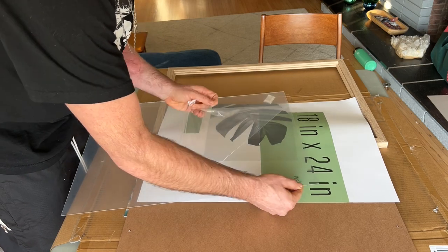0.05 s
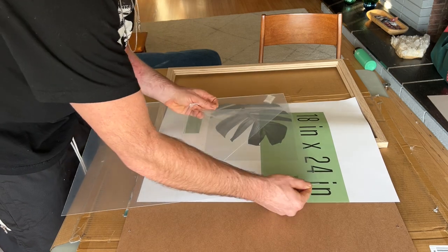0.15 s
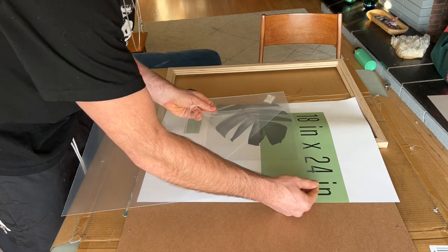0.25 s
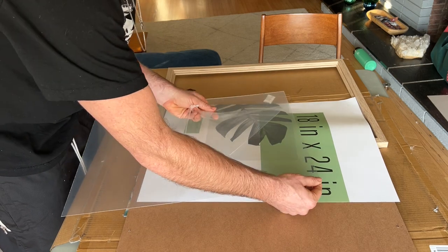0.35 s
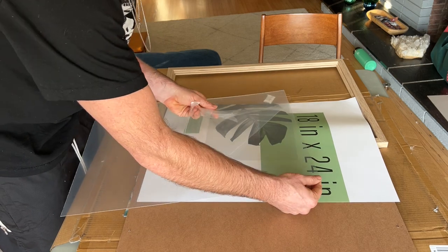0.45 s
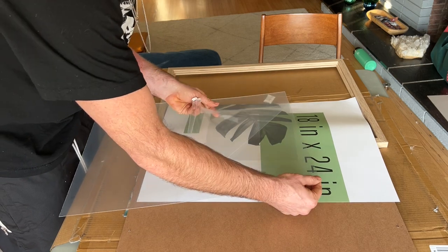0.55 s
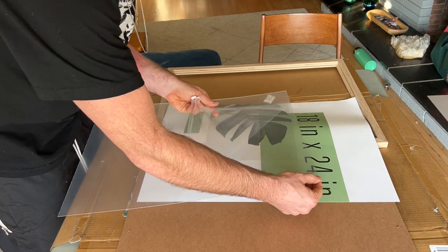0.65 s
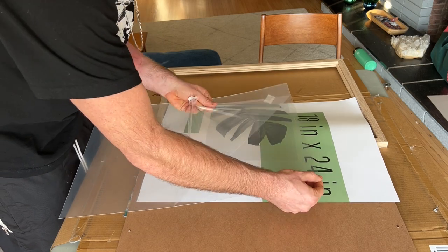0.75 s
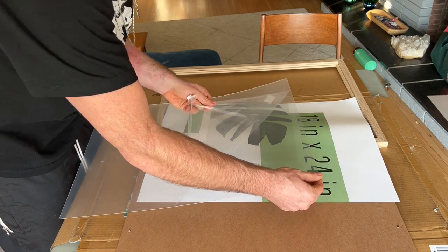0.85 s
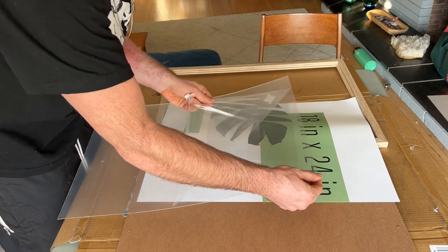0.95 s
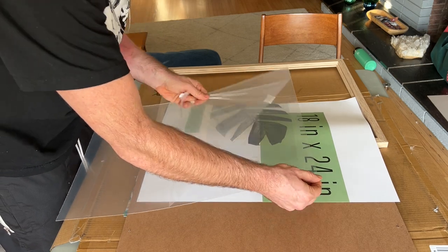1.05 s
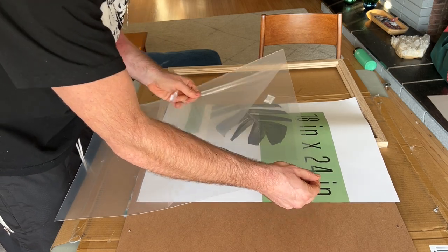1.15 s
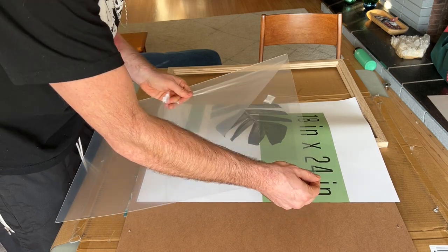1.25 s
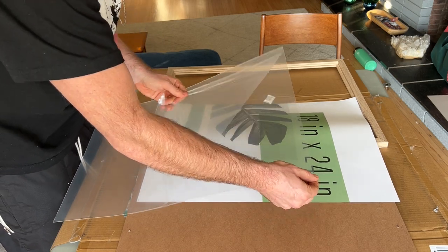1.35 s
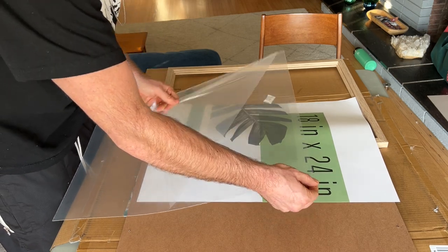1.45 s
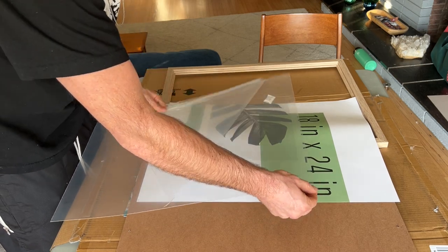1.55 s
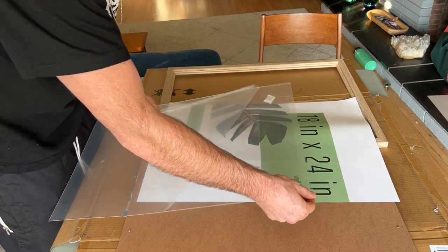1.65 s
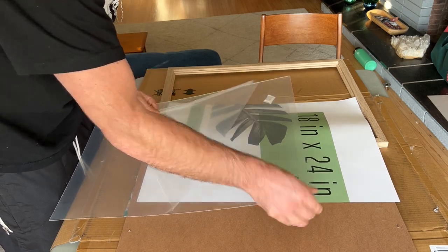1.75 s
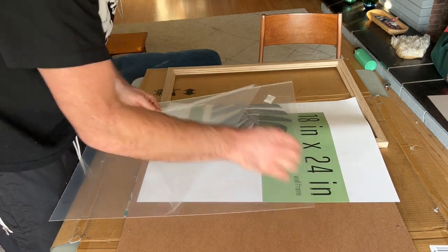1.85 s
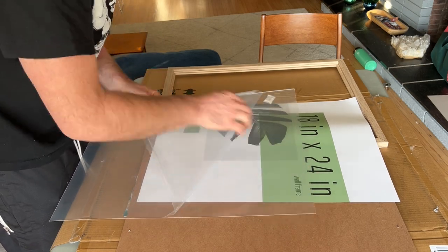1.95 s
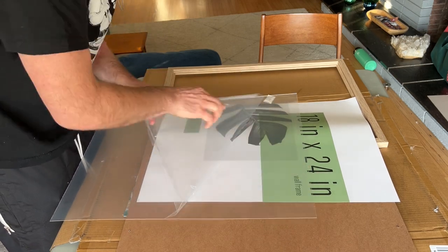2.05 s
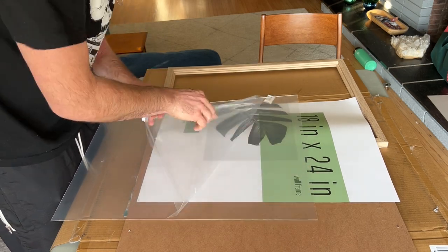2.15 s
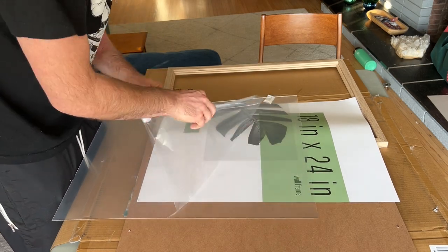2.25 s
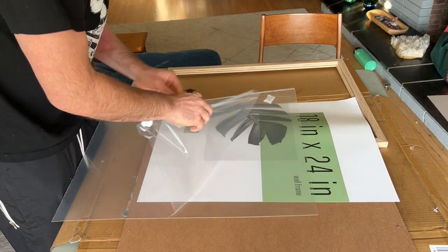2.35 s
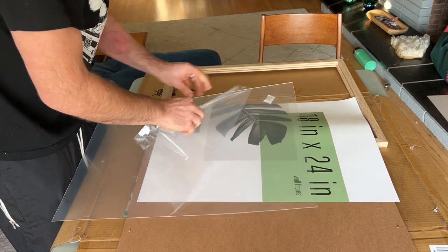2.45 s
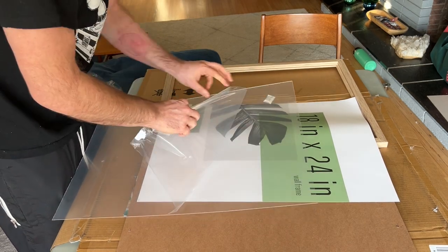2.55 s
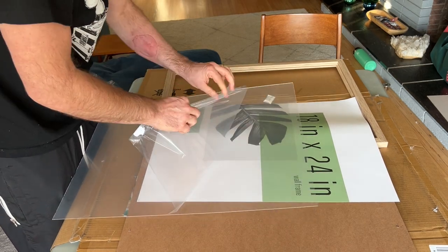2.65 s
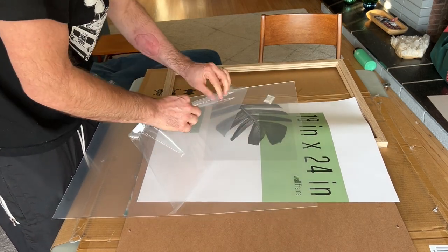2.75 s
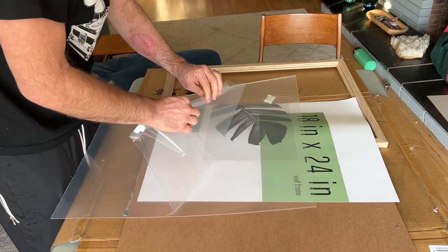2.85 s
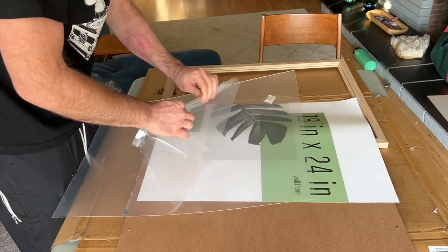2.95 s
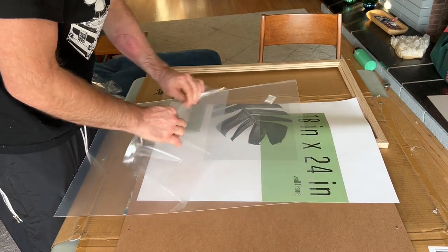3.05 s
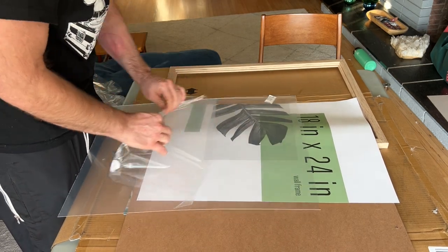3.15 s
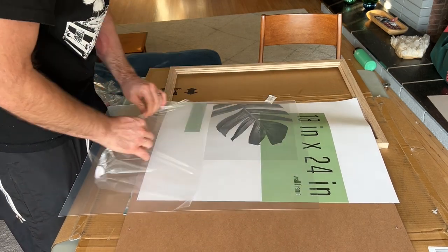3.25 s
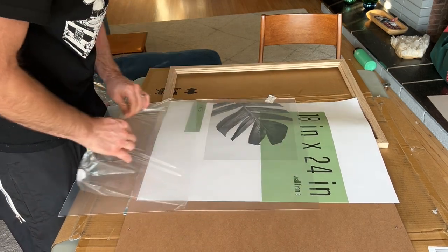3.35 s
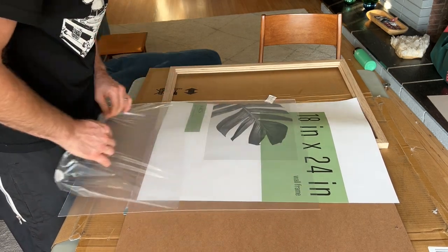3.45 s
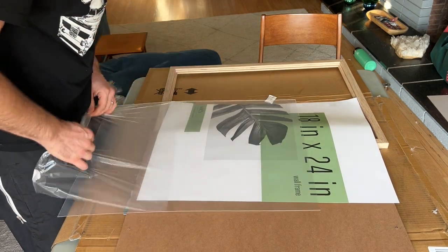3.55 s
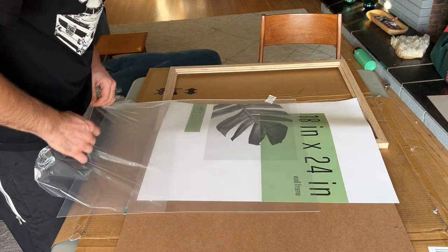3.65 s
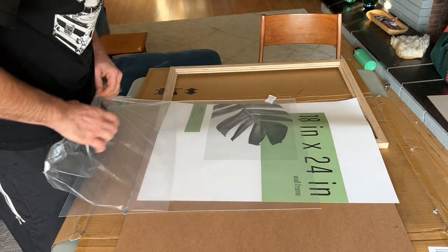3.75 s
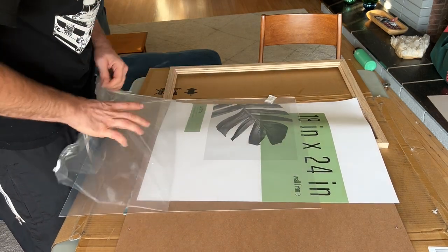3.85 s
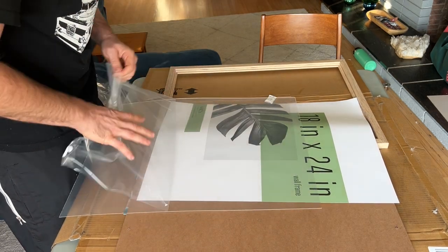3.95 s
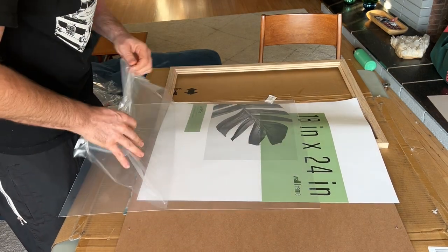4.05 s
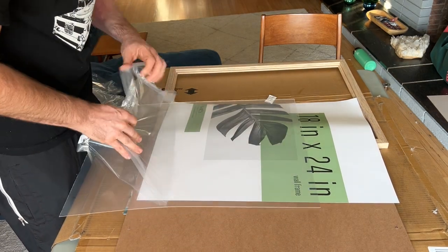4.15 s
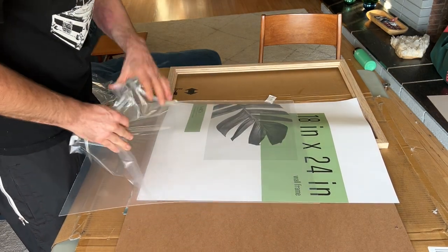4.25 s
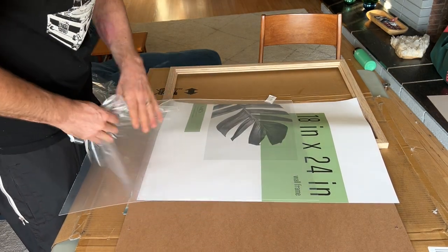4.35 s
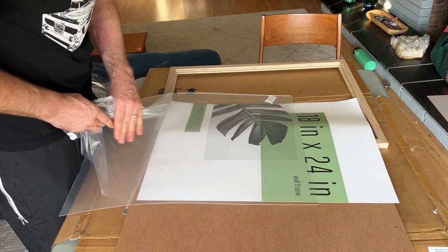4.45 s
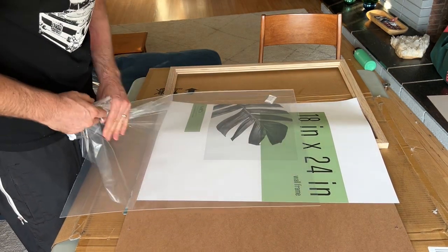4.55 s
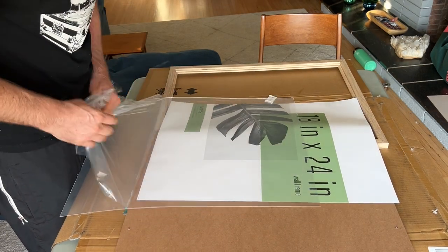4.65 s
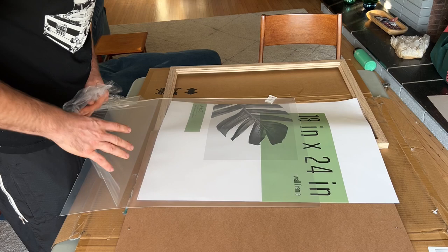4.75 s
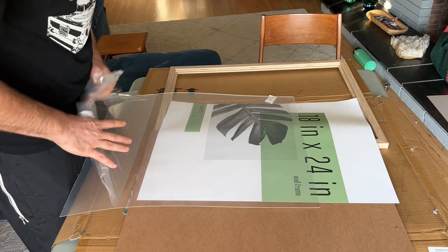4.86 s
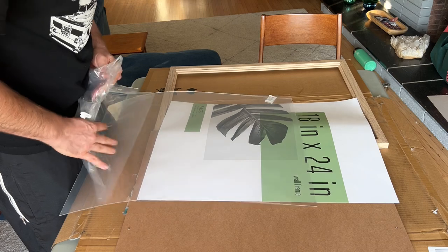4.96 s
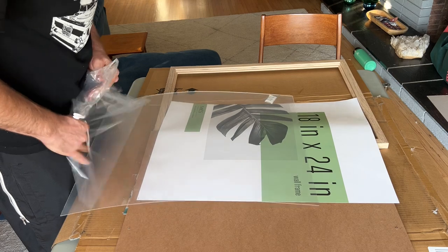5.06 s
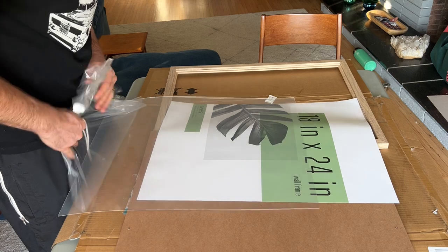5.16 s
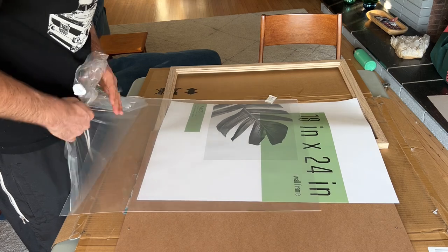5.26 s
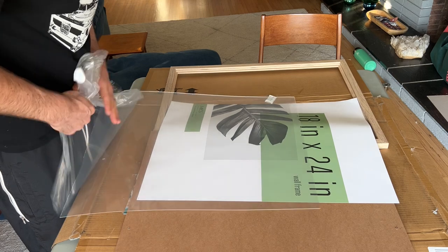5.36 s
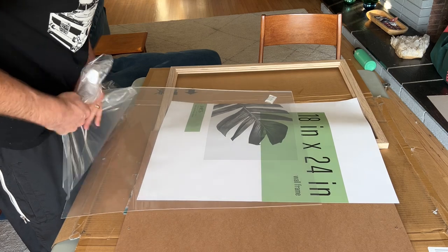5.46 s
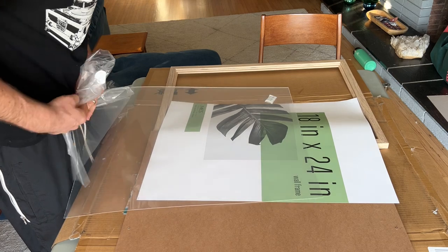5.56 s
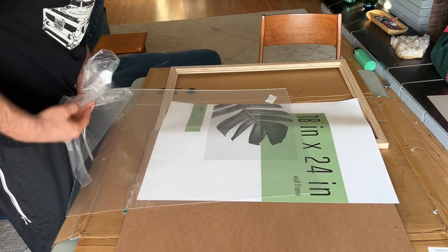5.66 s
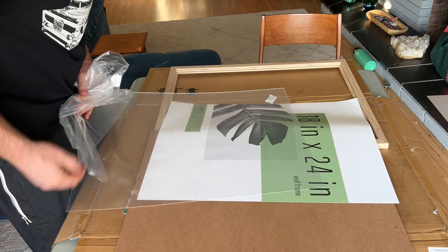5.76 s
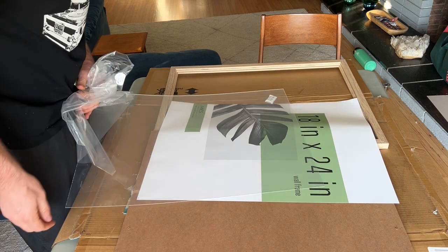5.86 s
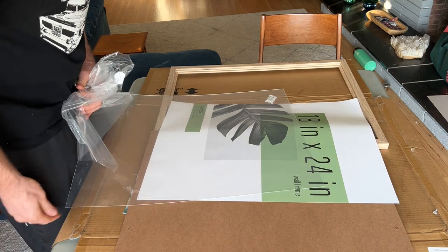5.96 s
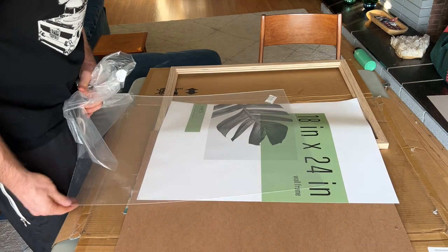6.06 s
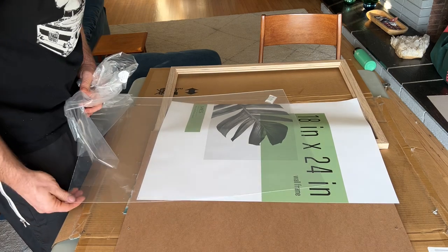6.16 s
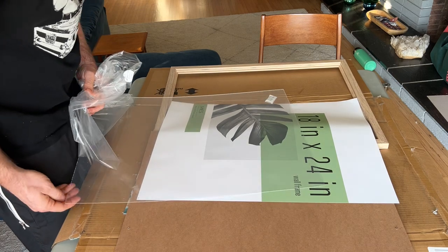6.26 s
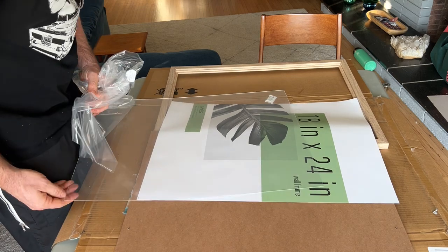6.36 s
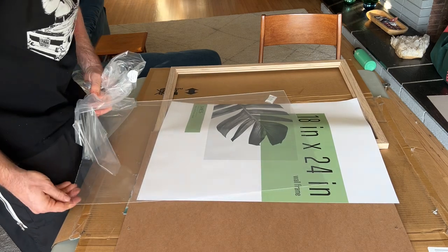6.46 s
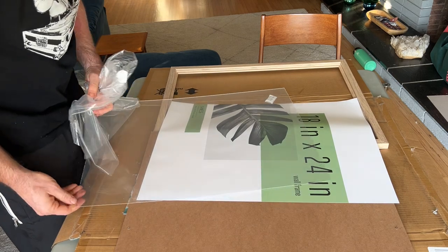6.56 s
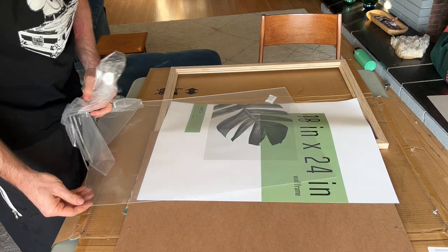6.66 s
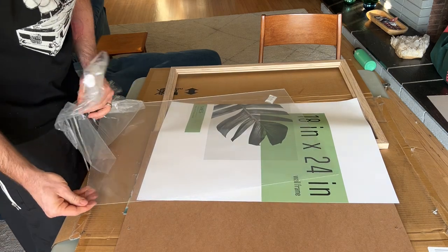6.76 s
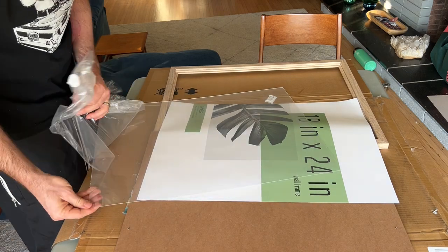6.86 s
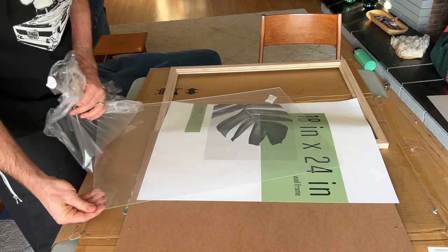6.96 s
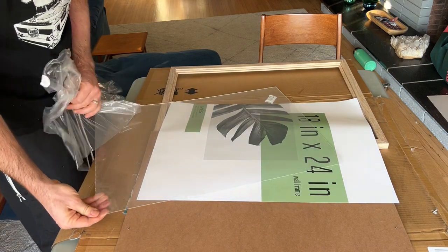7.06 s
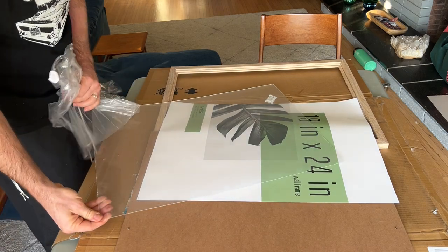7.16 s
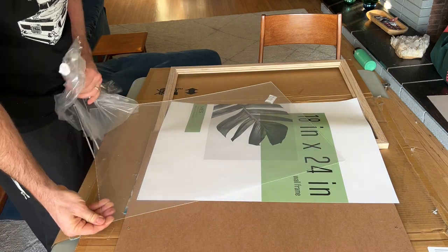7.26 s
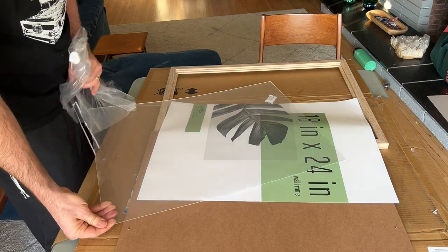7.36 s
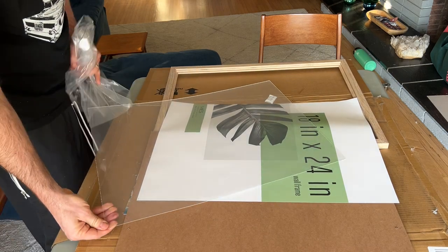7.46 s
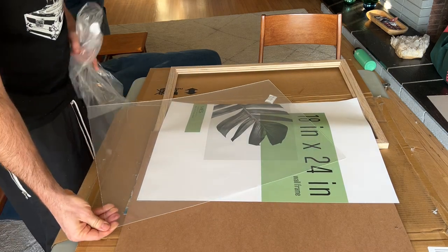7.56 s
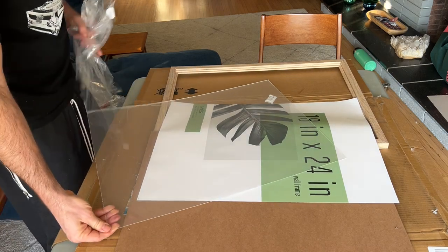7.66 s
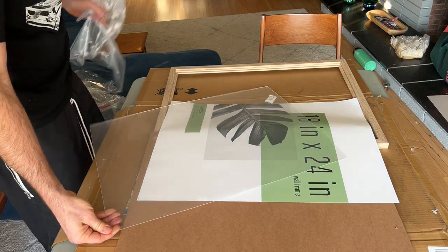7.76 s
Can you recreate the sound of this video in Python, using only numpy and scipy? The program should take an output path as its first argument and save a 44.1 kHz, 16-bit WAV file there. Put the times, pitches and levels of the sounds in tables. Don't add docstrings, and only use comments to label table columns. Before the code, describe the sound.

Thin plastic film is peeled off a stiff sheet in crackling pulls and short zipping slips, then crumpled and rustled by hand in a furnished room.

```python
import sys
import numpy as np
from scipy import signal
from scipy.fft import rfft, irfft, next_fast_len
from scipy.io import wavfile
from scipy.ndimage import uniform_filter1d

SR = 44100
rng = np.random.default_rng(int(sys.argv[2]) if len(sys.argv) > 2 else 0)


def makeup_ratio(level_db):
    decades = np.asarray(level_db, float) / 20
    return 10 ** decades


def generate_wav(signal):
    frames = np.transpose(np.atleast_2d(signal))
    scaled = np.clip(frames, -1, 1) * 32767
    pcm = np.round(scaled).astype(np.int16)
    wavfile.write(sys.argv[1], SR, pcm)


N = 343627


def evened(x):
    return x / np.sqrt(np.mean(x ** 2) + 1e-20)


def smooth_patches(noise, bands, frames):
    return evened(uniform_filter1d(uniform_filter1d(noise, size=bands, axis=0), size=frames, axis=1))


def read(points, hz):
    f, value = np.transpose(points)
    return np.interp(np.log(hz + 1), np.log(f + 1), value)


def add(mix, s, sound):
    part = mix[round(s * SR):][:len(sound)]
    part += sound[:len(part)]


def resonate(x, hz, width):
    turn = np.exp(2j * np.pi * np.cumsum(hz * np.ones(len(x))) / SR)
    r = np.exp(-np.pi * width / SR)
    return 2 * (turn * signal.lfilter([1 - r], [1, -r], x / turn)).real


def band(x, lo_hz, hi_hz, order=2):
    return signal.sosfilt(signal.butter(order, [lo_hz, hi_hz], "band", fs=SR, output="sos"), x)


def snaps(per_s, spread_db, clump_db):
    size = makeup_ratio(spread_db * np.minimum(rng.exponential(1, N), 4)) * rng.choice([-1., 1.], N)
    clumps = evened(uniform_filter1d(uniform_filter1d(rng.standard_normal(N), size=200), size=200))
    happens = rng.random(N) < per_s / SR
    return evened(size * happens * makeup_ratio(clump_db * clumps))


def sheet(x):
    # pitch in Hz, width in Hz, level in dB.
    bending_modes = [(165.5, 34, -1.5), (212.5, 27, -9), (404, 143, 4.5), (467.5, 17, -3), (753, 160, -4.5),
                     (1000, 280, -7)]
    total = np.zeros(len(x))
    for hz, width, db in bending_modes:
        total += makeup_ratio(db) * evened(signal.lfilter(*signal.iirpeak(hz, hz / width, SR), x))
    return evened(band(total, 86, 1800))


def rumble():
    # pitch in Hz, level in dB per Hz.
    house_noise = [(15, -18), (30, -18), (52, -2), (80, 3.5), (115, -14), (158, -11), (250, -22.5),
                   (390, -23.5), (500, -18), (600, -24), (750, -30), (1000, -32), (1600, -29.5),
                   (3500, -36), (6400, -32), (10000, -34.5), (16000, -36)]
    rumble_db, patchy_db = -45.5, 0.37
    frames, hz = N // 512 + 5, np.fft.rfftfreq(2048, 1 / SR)
    a, b, c, d, patches = rng.standard_normal((frames, 1025, 5)).T
    patches = smooth_patches(patches, 12, 8)
    z = np.array([a + 1j * b, c + 1j * d]) * makeup_ratio(read(house_noise, hz)[:, None] + patchy_db * patches)
    return makeup_ratio(rumble_db) * evened(signal.istft(z, nperseg=2048, noverlap=1536)[1][:, :N])


def rustle():
    # peak time in seconds, peak level in dB, build-up in seconds, settling in seconds,
    # sheet wobble in dB. Build-up and settling are the times for a change of squeeze_db.
    handfuls = [(0.0, -37.5, .01, 0.24, 7), (.49, -34.5, .004, 0.2, -7.5), (.712, -49.5, 0.013, 0.076, 14),
                (1.12, -33.5, 0.12, .03, 1.5), (2.192, -36.5, 0.11, 0.32, -1), (2.59, -46, 0.56, 0.036, -2),
                (2.8, -44.5, 0.18, 0.04, -18), (3.84, -44, 0.6, 0.2, 2), (4.04, -26, 0.23, 0.17, -2.5),
                (4.569, -17, 0.23, 0.038, -1.5), (4.91, -23, 0.13, 0.045, -2), (5.56, -20.5, .04, 0.33, -3),
                (.46, -56, 0.038, 0.035, 5), (6.308, -48.5, 0.021, 0.98, 2), (6.64, -54, 0.055, 0.053, -25),
                (6.848, -45.5, 0.17, 0.022, -5), (7.68, -31.5, 0.013, 0.13, -15),
                (7.76, -42.5, 0.12, 0.18, 9), (.899, -44, .003, 0.078, 0), (2.29, -42, 0.083, 0.19, -25),
                (5.74, -50, 0.1, 0.12, 16.5), (5.985, -55, .012, 0.15, 20.5), (6.09, -57, 0.015, 0.1, 18.5)]
    squeeze_db = 20
    level, shake = np.zeros((2, N))
    for s, db, build, settle, wobble_db in handfuls:
        start = max(s - 2 * build, 0)
        t = np.arange(start, s + 2 * settle, 1 / SR) - s
        squeeze = makeup_ratio(db - squeeze_db * np.maximum(-t / build, t / settle))
        add(level, start, squeeze)
        add(shake, start, squeeze * makeup_ratio(wobble_db - 7.5))
    crinkle = evened(band(snaps(700, 1.9, 5.1), 3900, 22000, order=1))
    slide = evened(band(snaps(15000, 2.5, 3.), 920, 18400, order=1))
    wobble = sheet(snaps(1200, 1.5, 2.2))
    return level * (0.41 * crinkle + 0.61 * slide) + shake * wobble


def ticks():
    # start in seconds,
    # peak level in dB, ring pitch in Hz, bright click over the peak in dB.
    crease_flips = [(0.2063, -28.5, 3750, -11), (0.4885, -41, 6760, 16.5), (0.5591, -33, 7310, -2),
                    (0.5734, -26, 2630, -13), (0.6153, -19, 6240, 0), (0.6893, -24.5, 2660, -4),
                    (0.7295, -30, 7100, -4), (0.8988, -29, 2640, -2.5), (0.968, -24.5, 6000, -14),
                    (1.044, -21.5, 7400, -4), (1.054, -22, 7280, -18), (1.0863, -24, 4920, -11),
                    (1.97, -31, 2590, -11), (2.0617, -34, 3500, -21), (2.0885, -29.5, 6670, -24),
                    (2.2544, -32, 5220, -14), (2.3042, -24, 2800, -18), (2.342, -22, 2440, -30),
                    (2.365, -20, 3170, -17), (2.3796, -9, 6300, -26), (2.749, -32, 3960, -17),
                    (2.766, -29, 4090, -21),
                    (3.677, -16, 2450, -9), (3.779, -27, 7600, -2), (3.828, -27, 2150, -20),
               (3.8752, -35, 2340, -15.5), (3.9097, -22, 2400, -17), (3.994, -31, 5370, -27),
               (4.0324, -22, 2660, -2), (4.1186, -26, 2640, -8), (4.1673, -25, 5100, -15),
               (4.498, -28, 3240, -10.5), (5.714, -35, 6255, 11), (5.776, -35, 4300, 9),
               (5.9738, -29, 2482, -22), (5.9816, -25, 2330, -13), (6.0363, -30, 2660, -19),
               (6.228, -38, 2680, -5), (6.308, -32, 4350, -9), (6.36, -40, 3060, -6),
               (6.428, -23.5, 7030, -14), (6.4353, -27, 7800, -22), (6.4916, -34, 5100, -9),
               (6.627, -31, 4830, -16), (6.6367, -41, 4500, -7), (6.707, -33, 2670, -28),
               (6.7675, -34, 3930, -17), (6.825, -28, 3460, -14), (.2976, -37, 3390, -2),
               (.847, -49, 5090, -6), (2.136, -33, 6500, -2)]
    # start in seconds, peak level in dB,
    # ring pitch in Hz, bright click over the peak in dB, dying time in ms.
    tears = [(1.008, -34, 6000, -10, 1.5), (1.012, -33, 2750, -12, 4.5), (1.07, -25, 3000, -10, 1.2),
             (1.0745, -32, 4000, -12, 1.5), (1.0795, -27, 2300, -18, 1), (1.1027, -22, 2270, -10, 3.2),
             (1.1254, -11, 3480, -10, 2.7), (1.3715, -21, 2500, -14, 1.1), (1.377, -12, 4970, -9, 2),
             (1.388, -17, 4000, -12, 1.5), (1.3962, -14, 5000, -12, 1.5), (1.4017, -13, 5000, -12, 1.5),
             (1.93, -41, 5500, -21, 4), (2.2767, -34, 1900, -19, 4.1), (2.35, -32, 2410, -20, 1.2),
             (2.811, -27, 6000, -14, 1.2), (2.8568, -10, 3500, -12, 1), (.4708, -52, 7500, -4, 1.1),
             (.3162, -41, 4000, -12, 1), (0.3458, -41, 1760, -14, 1), (0.829, -50, 5250, -16, 1),
             (2.105, -46, 7500, 0, 1), (2.1435, -41, 2200, -16, 1.7), (3.747, -40, 2003, -16, 1.7),
             (3.815, -33, 2000, -18, 1.2), (5.91, -34, 1500, -16, 2), (6.14, -49, 4000, -20, 2),
             (6.182, -50, 4000, -20, 2)]
    flip_ms = .6
    rows = [(*row, flip_ms) for row in crease_flips] + tears
    out, t = np.zeros(N), np.arange(800) / SR
    for (s, db, hz, bright_db, ms), grit in zip(rows, rng.standard_normal((len(rows), 800))):
        ring = evened(resonate(grit, hz, 0.67 * hz))
        crack = band(grit, 940, 9300, order=1)
        click = makeup_ratio(bright_db + 16) * band(grit, 8200, 14000, order=1)
        dying = np.exp(-t * 1000 / max(ms, .2)) * np.minimum(t / 0.00026, 1)
        add(out, s, makeup_ratio(db - 0.3) * dying * (0.45 * ring + 0.85 * crack + click))
    return out


def bumps():
    # start in seconds, peak level in dB, first pitch in Hz, time to die by 60 dB in seconds.
    knocks = [(.705, -43, 600, .08), (2.18, -27.5, 426, 0.071), (4.718, -32, 76.5, 0.13),
              (5.198, -31, 87, 0.27), (5.31, -21, 490, 0.097), (5.801, -42, 85, .14),
              (5.978, -34, 1000, .08), (1.56, -29, 800, .1), (1.6, -27, 1700, .08), (2.858, -27, 420, .1),
              (2.9, -27, 400, .08), (6.077, -36, 1080, 0.15), (6.706, -41.5, 896, 0.33),
              (6.789, -44, 1710, 0.065), (7.72, -23, 1040, .07), (7.731, -31, 640, .06),
              (7.747, -28.5, 560, .07), (2.17, -34.5, 1910, 0.23), (3.75, -42, 605, .2),
              (6.035, -41, 2700, .06)]
    sag_octaves, sag_s = 1.1, .03
    puff_share, tone_hz = .6, 700
    out, t = np.zeros(N), np.arange(8000) / SR
    puffs = rng.standard_normal((len(knocks), 8000))
    for (s, db, first_hz, t60), puff in zip(knocks, puffs):
        hz = first_hz * 2 ** (-sag_octaves * (1 - np.exp(-t / sag_s)))
        wide = .7 * first_hz
        tone = np.sin(2 * np.pi * np.cumsum(hz) / SR) * tone_hz / (tone_hz + first_hz)
        knock = tone + puff_share * evened(resonate(resonate(puff, hz, wide), hz, wide))
        add(out, s, makeup_ratio(db - 60 * t / max(t60, .01)) * np.minimum(t / 0.0014, 1) * knock)
    return out


def taut(s):
    # time in seconds, ring of the taut film in Hz, slack in dB.
    film_states = [(1.2, 5900, 5.5), (1.39, 5530, 10), (1.45, 6060, 1.5), (1.6, 4750, 1), (2.93, 5500, -4),
                   (3.14, 5960, -1), (3.55, 5740, -1), (4.22, 4840, -0.5), (4.33, 6000, 0),
                   (4.6, 5330, -2.5), (4.95, 5330, 6.5), (5.04, 5900, 6.5), (5.3, 5960, 7.5),
                   (5.46, 4680, 11), (6.94, 4800, 1), (7.3, 4930, 0.5), (7.46, 6400, 0), (7.65, 7900, -5)]
    when, ring_hz, slack_db = np.transpose(film_states)
    return np.interp(s, when, ring_hz), np.interp(s, when, slack_db)


def film(ring_hz):
    dense = snaps(6000, 1.7, .6)
    body = resonate(resonate(dense, ring_hz, 3700), ring_hz, 3800)
    fine = band(snaps(9000, 2.6, .6), 8160, 14500)
    coarse = band(snaps(2500, 2.4, 0.64), 1425, 3890)
    return evened(band(body, 2950, 8640)), evened(fine), evened(coarse)


def pulls(body, fine, coarse):
    # start in seconds, hold in seconds, rise in seconds, first level in dB, last level in dB.
    steady_pulls = [(1.124, 0.11, 0.015, -25, -18.5), (1.376, 0.23, 0.04, -16, -15.5),
                    (2.92, 0.62, 0.021, -18, -14), (4.203, 0.071, 0.027, -18.5, -17),
                    (4.32, 0.069, 0.012, -18, -15), (4.554, 0.19, 0.042, -15.5, -14.5),
                    (4.93, 0.055, 0.017, -19, -16), (5.013, 0.067, .007, -14.5, -17.5),
                    (5.143, 0.074, 0.023, -23, -20), (5.3, 0.075, 0.0091, -23.5, -18.5),
                    (5.429, 0.12, 0.057, -16.5, -23.5), (6.916, 0.2, 0.024, -23.3, -25),
                    (7.119, 0.54, 0.047, -28, -23)]
    swell, let_go_db_per_s = 0.43, 413
    jolt_db, jolt_s = 7.5, 0.022
    pull, jolt = np.zeros((2, N))
    for s, hold, rise, first_db, last_db in steady_pulls:
        t = np.arange(0, hold + .12, 1 / SR)
        db = first_db + (last_db - first_db) * np.minimum(t / hold, 1) ** swell
        db = db - let_go_db_per_s * np.maximum(t - hold, 0)
        add(pull, s, np.minimum(t / max(rise, .001), 1) * makeup_ratio(db))
        add(jolt, s, makeup_ratio(jolt_db) * np.exp(-t / jolt_s))
    ring_hz, slack_db = taut(np.arange(N) / SR)
    bright = makeup_ratio(3 + 4.5 * np.log2(ring_hz / 5620) + 0.26 * slack_db) * (1 + 0.4 * jolt)
    creasing = pull ** 0.7 * makeup_ratio(-21.5 + slack_db)
    shake = pull ** 0.49 * makeup_ratio(-29 + 1.13 * slack_db) * (1 + jolt)
    wobble = uniform_filter1d(shake, size=1500, origin=400) * sheet(snaps(2500, 2.0, 2.0))
    return pull * (body + bright * fine) + creasing * coarse + wobble


def slips(body, fine, coarse):
    # start in seconds, peak level in dB, length in ms, fine snaps in dB, rise in ms.
    short_slips = [(2.381, -9, 21.6, -2.5, 4.6), (2.4155, -10.5, 18, -2, 1.5), (2.4465, -10.5, 27, -1.5, 3),
                   (2.4797, -9, 24, -7, 3.8), (2.527, -8.5, 14.5, -6, 5), (2.8153, -9.5, 32, -7.5, 0.56),
                   (2.8598, -7, 11, -7.5, 1.2), (2.897, -11.5, 31, -13, 2), (4.878, -32, 23, 10.5, 2),
                   (5.128, -12.5, 13, 2, 1), (5.262, -14.5, 19, -4, 2.5), (5.441, -19.5, 24, -4, 5.4),
                   (4.93, -16, 11, -6, 2), (4.319, -15, 13, 3, 2), (6.854, -25.5, 33, -6, 2.7),
                   (6.8847, -19, 20, -7, 3.4), (6.903, -22, 8.9, -4, 1.2), (4.205, -17, 14, -3, 2)]
    coarse_db, wobble_db = -6, -12
    wobble = sheet(snaps(1300, 5.3, 3.1))
    out = np.zeros(N)
    for s, db, ms, fine_db, rise_ms in short_slips:
        at = np.arange(round(s * SR), round((s + .06) * SR))
        u = (at / SR - s) * 1000 / max(ms, 1)
        hold = (1 - np.exp(-u * ms / max(rise_ms, .2))) * np.exp(-u ** 3)
        loose = makeup_ratio(taut(s)[1]) * (makeup_ratio(coarse_db) * coarse[at] + makeup_ratio(wobble_db) * wobble[at])
        add(out, s, makeup_ratio(db - 7.5) * hold * (body[at] + makeup_ratio(fine_db + 8.5) * fine[at] + loose))
    return out


def footfall():
    start_s, peak_db, hz, t60 = 6.626, -28, 42, .25
    out, t = np.zeros((2, N)), np.arange(0, .3, 1 / SR)
    push = -np.sin(2 * np.pi * hz * t) * (1 - np.exp(-t / .004))
    add(out[0], start_s, makeup_ratio(peak_db - 60 * t / t60) * push)
    return out


def room(x, patchy_db, drift_db):
    # delay in ms, level in dB.
    table_echoes = [(.8, -35), (1.3, -44), (2.1, -51), (3.2, -13)]
    # pitch in Hz, time to die by 60 dB in seconds.
    ring_times = [(200, 0.75), (1000, 0.4), (3000, 0.37), (6000, 0.44), (10000, 0.35), (15000, 0.18)]
    # pitch in Hz, level in dB.
    wetness = [(200, -2), (1500, -4), (4000, -6), (12000, -6.5)]
    near = np.zeros(200)
    near[0] = 1
    for ms, db in table_echoes:
        near[round(ms * SR / 1000)] = makeup_ratio(db)
    direct = signal.oaconvolve(x, near / np.linalg.norm(near))
    hz, t, z = signal.stft(direct, SR, nperseg=256, noverlap=192)
    a, b, c, d, patches, spin, drift = rng.standard_normal((len(t), len(hz), 7)).T
    z = z * makeup_ratio(patchy_db * smooth_patches(patches, 5, 40))
    scattered = z * 1.9 * np.exp(1j * np.pi * spin)
    keep = makeup_ratio(-120 * 64 / SR / read(ring_times, hz))
    power = uniform_filter1d(abs(z) ** 2, size=11, axis=0)
    held = np.array([signal.lfilter([0, 0, 0, 0, 0, 1 - k], [1, -k], p) for k, p in zip(keep, power)])
    tails = np.array([a + 1j * b, c + 1j * d]) * np.sqrt(2 * held) * makeup_ratio(read(wetness, hz))[:, None]
    views = np.array([z, scattered]) + tails
    views[1] *= makeup_ratio(drift_db * smooth_patches(drift, 4, 30) - 0.0094 * drift_db ** 2)
    return signal.istft(views, nperseg=256, noverlap=192)[1][:, :N]


def scene():
    sizes = film(taut(np.arange(N) / SR)[0])
    hands = rustle() + ticks() + bumps() + pulls(*sizes) + slips(*sizes)
    return room(hands, patchy_db=0.5, drift_db=2.8) + footfall() + rumble()


def band_limit(x):
    return signal.sosfilt(signal.butter(12, 16460, fs=SR, output="sos"), x)


def record(dry):
    # pitch in Hz, level in dB.
    recorder_tone = [(100, -3.5), (1000, -2), (3000, 0.5), (5000, 0), (7000, -3), (9000, 2), (11000, -2),
                     (13000, -6), (15700, 2), (16000, -46.5)]
    # pitch in Hz, likeness from 0 to 1, phase of right over left in radians,
    # left over right in dB.
    port_pair = [(0, .985, 0, .3), (200, .975, 0, .3), (450, .85, -.1, .8), (1100, .2, -.4, 1),
                 (1700, .7, -.3, .3), (2300, .92, 0, 0), (2900, .9, .1, 0), (3600, .5, .5, -.8),
                 (4600, .62, .6, -2), (5500, .2, .4, -4), (6000, .3, -.5, -3), (6900, .95, 0, -.3),
                 (7600, .96, -.1, 0), (8300, .6, -1.3, -1), (8850, .985, -3.08, 0), (9950, .985, -3.22, 0),
                 (10500, .72, -4.4, 0), (11200, .99, -6.24, 0), (12750, .99, -6.32, 0),
                 (13150, .6, -7.9, 0), (13500, .99, -9.38, 0), (15000, .99, -9.47, 0),
                 (15500, .6, -10.9, 0), (22050, .5, -12, 0)]
    size = next_fast_len(N + 2048)
    hz = np.fft.rfftfreq(size, 1 / SR)
    f, *columns = np.transpose(port_pair)
    same, turn, lean_db = (np.interp(hz, f, c) for c in columns)
    one, other = rfft(dry, size) * makeup_ratio(read(recorder_tone, hz) - 1.6)
    right = same * np.exp(1j * turn) * one + np.sqrt(1 - same ** 2) * other
    lean = makeup_ratio(lean_db / 2)
    pair = irfft(np.array([one * lean, right / lean]), size)[:, :N]
    return band_limit(np.clip(pair, -1, 1))


dry = scene()
out = record(dry)
generate_wav(out)
```